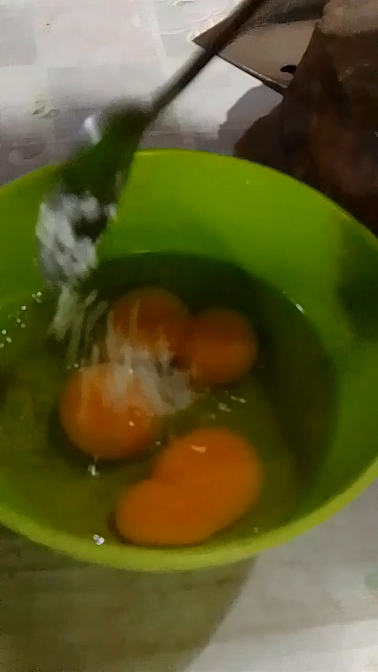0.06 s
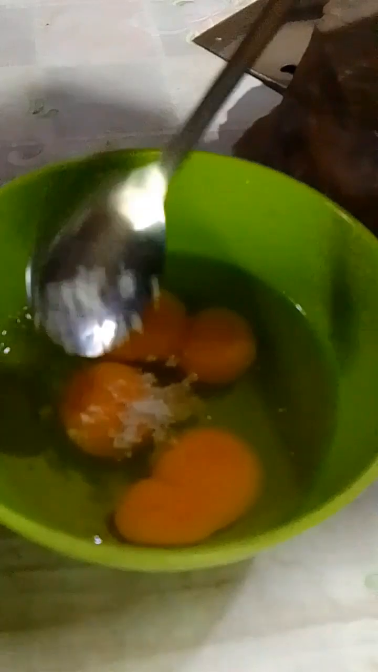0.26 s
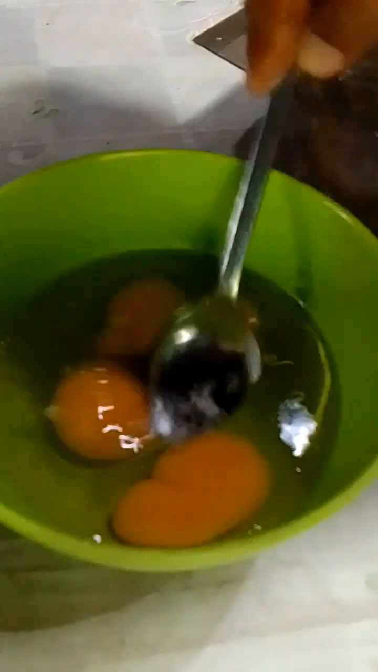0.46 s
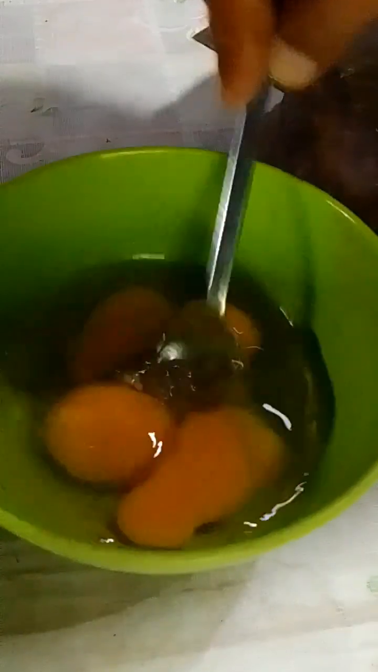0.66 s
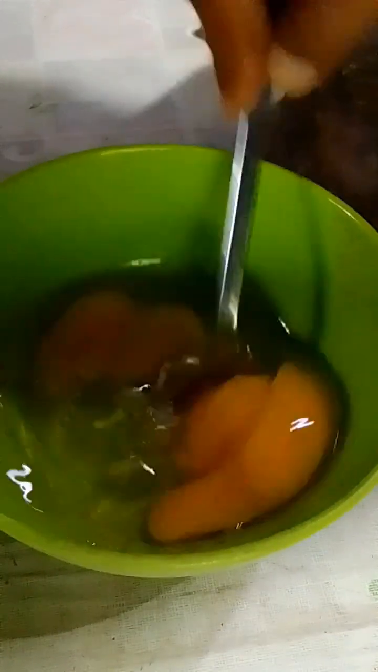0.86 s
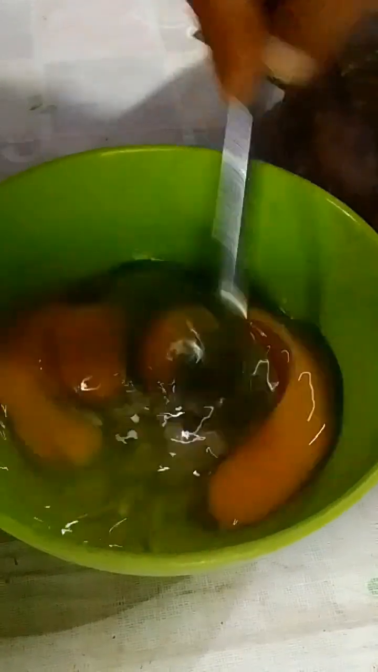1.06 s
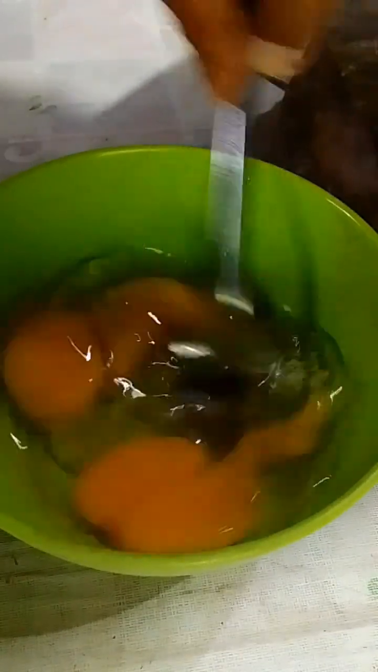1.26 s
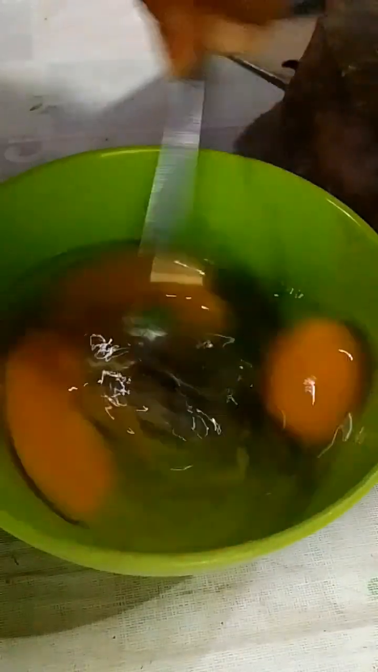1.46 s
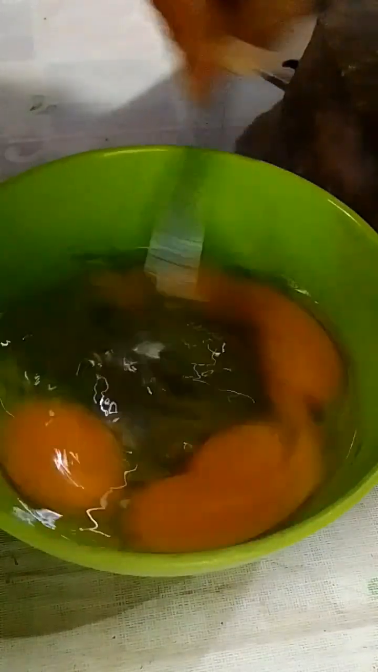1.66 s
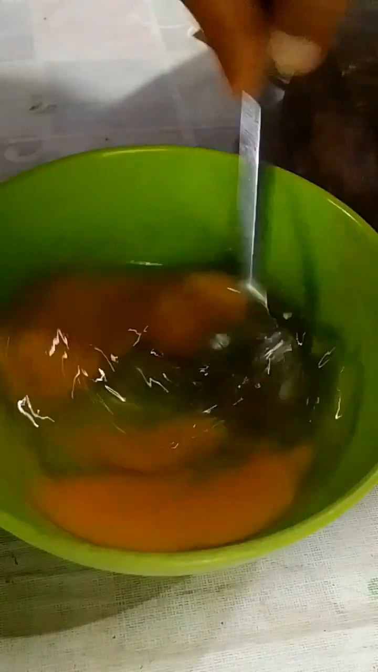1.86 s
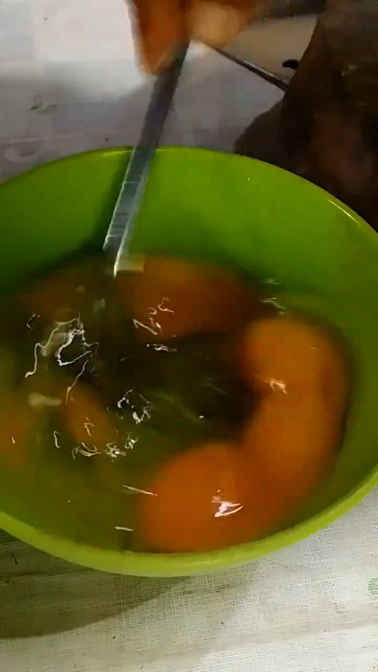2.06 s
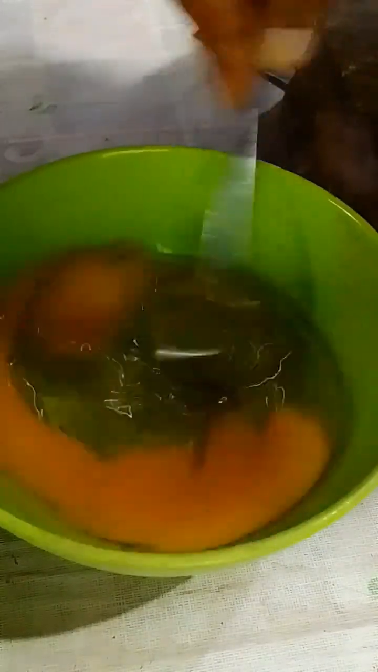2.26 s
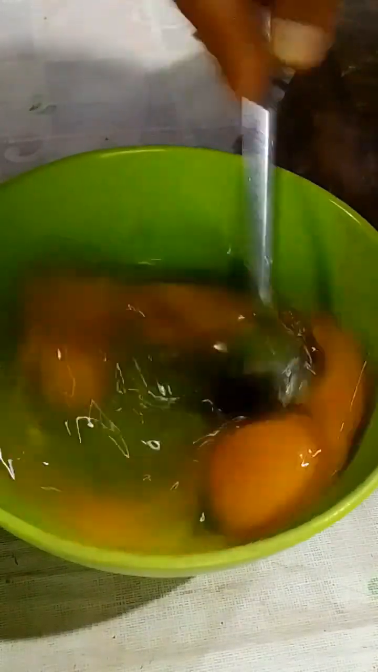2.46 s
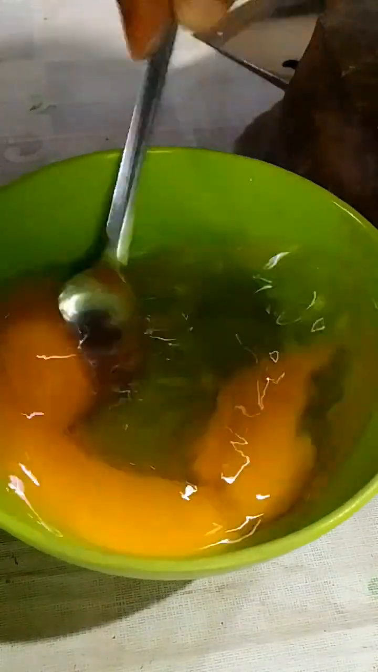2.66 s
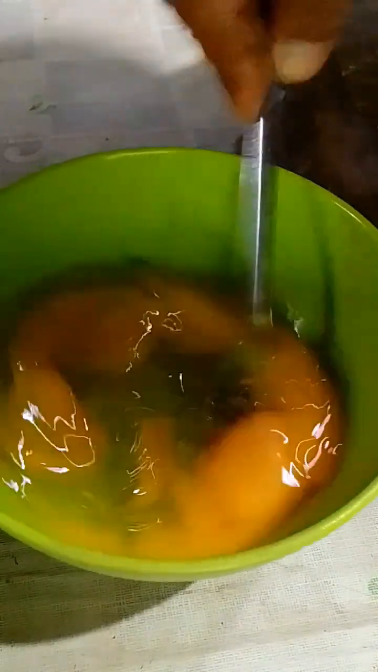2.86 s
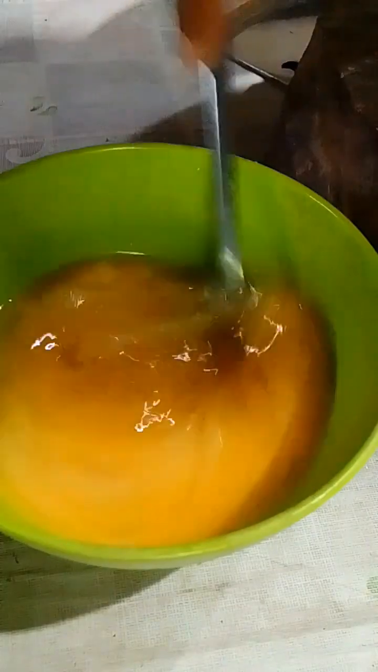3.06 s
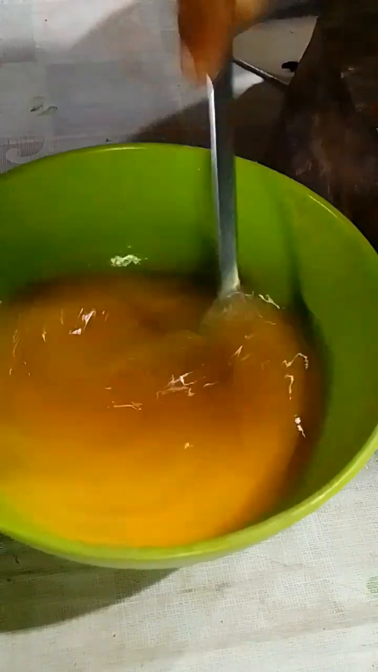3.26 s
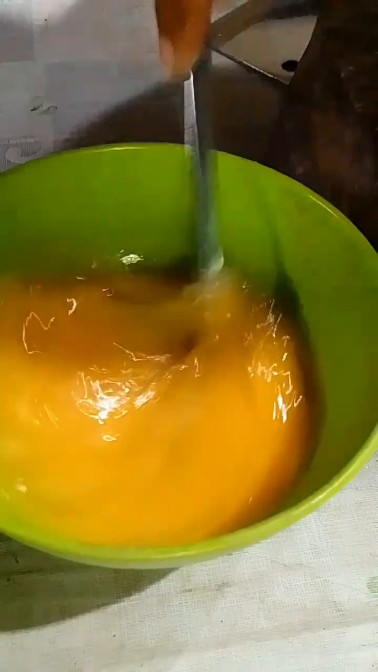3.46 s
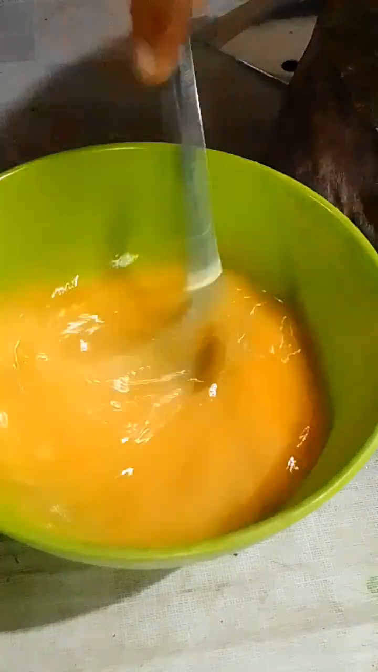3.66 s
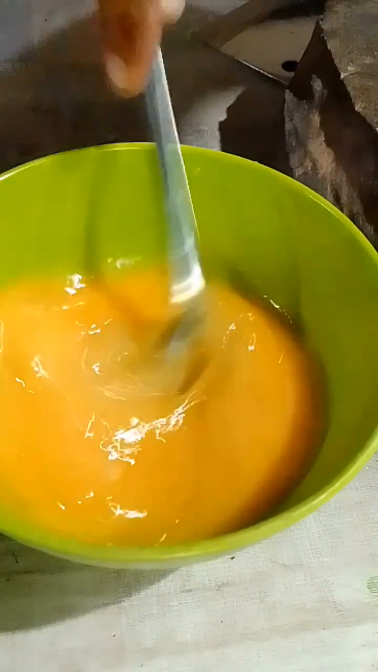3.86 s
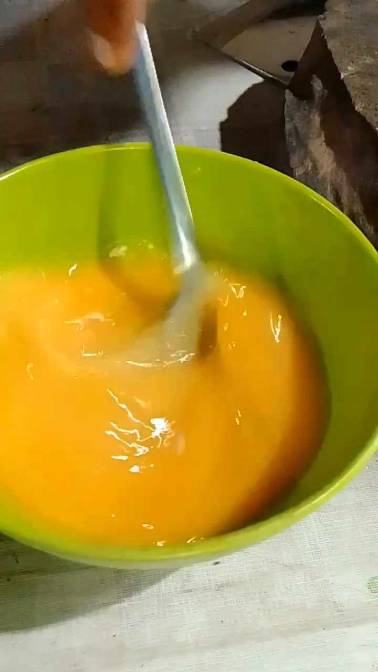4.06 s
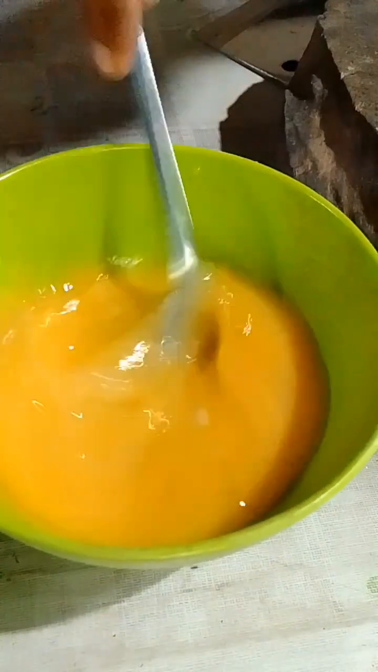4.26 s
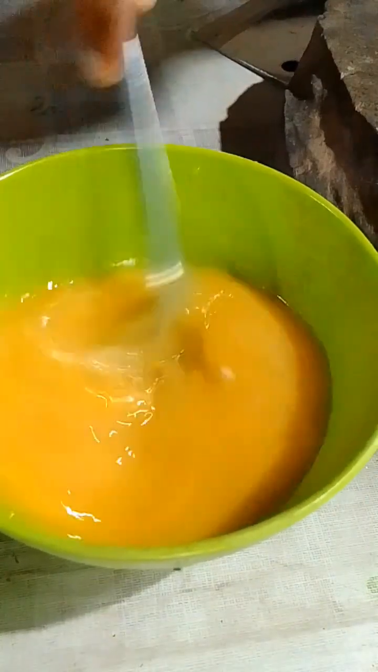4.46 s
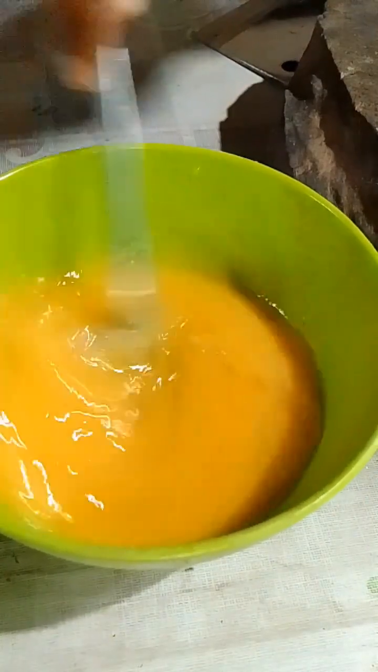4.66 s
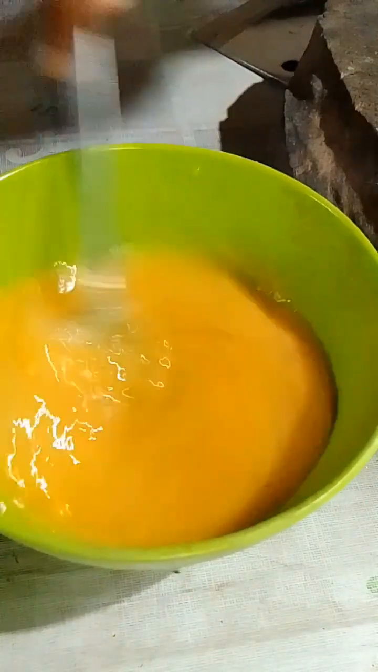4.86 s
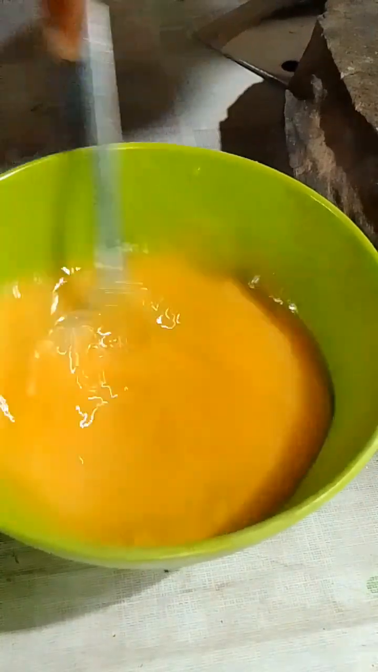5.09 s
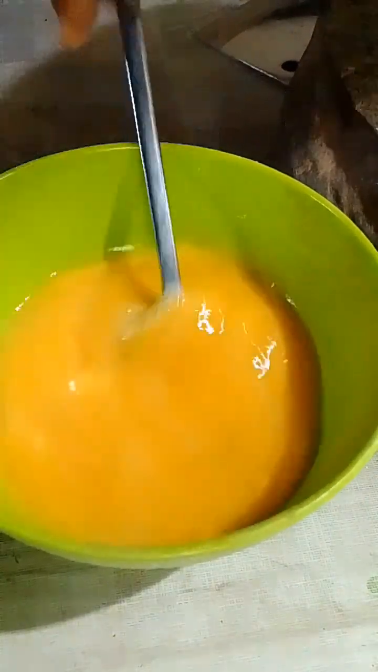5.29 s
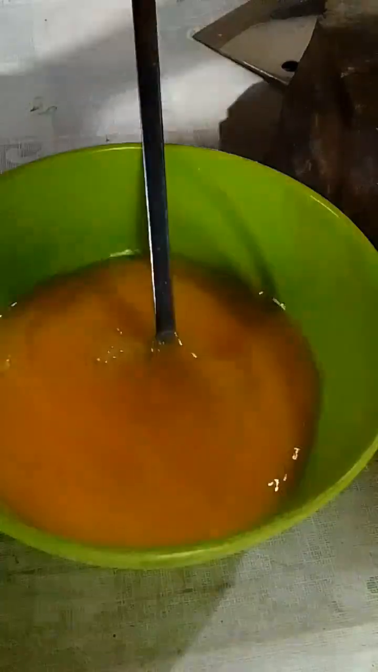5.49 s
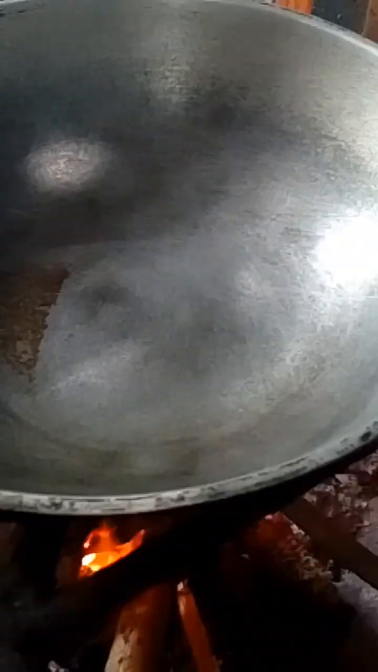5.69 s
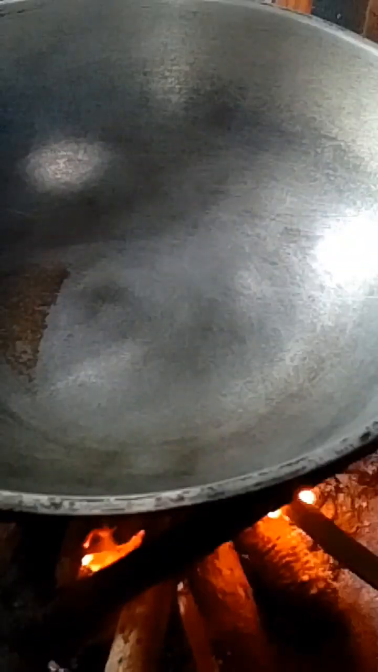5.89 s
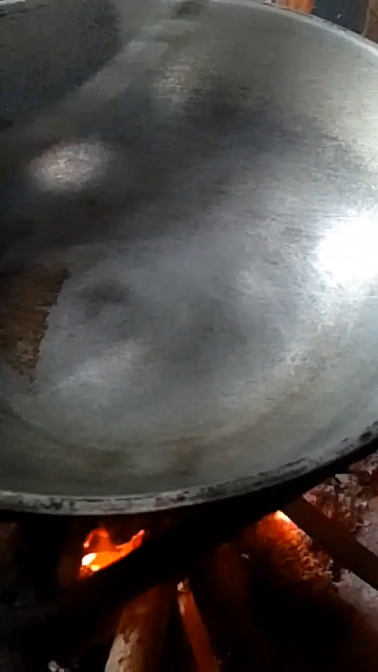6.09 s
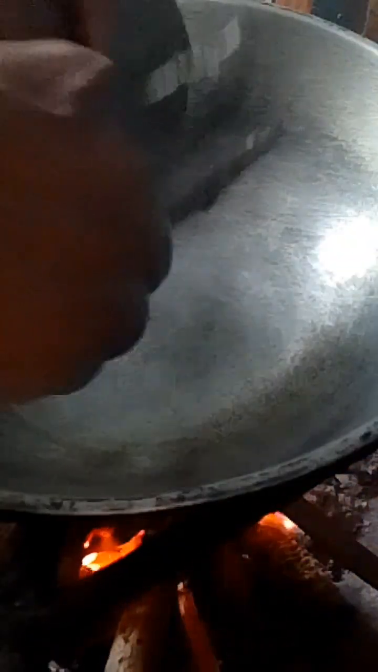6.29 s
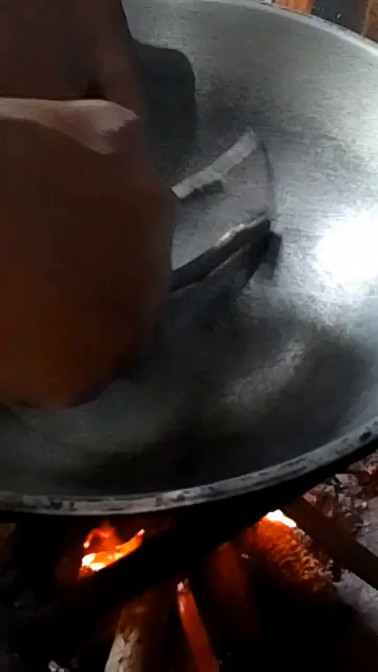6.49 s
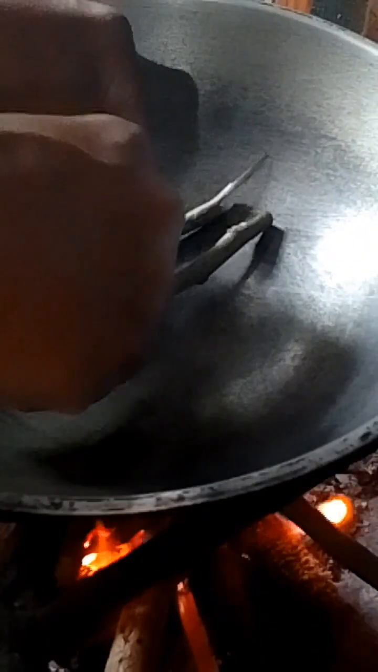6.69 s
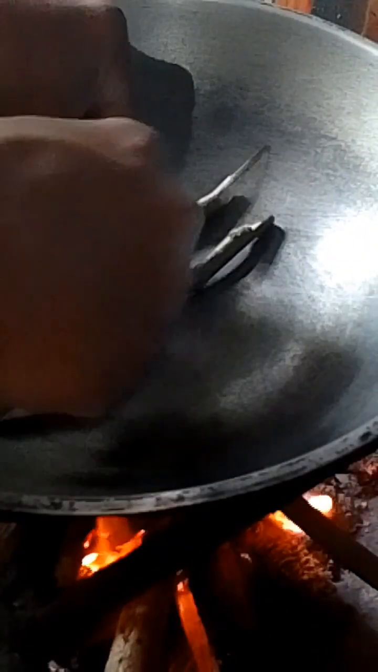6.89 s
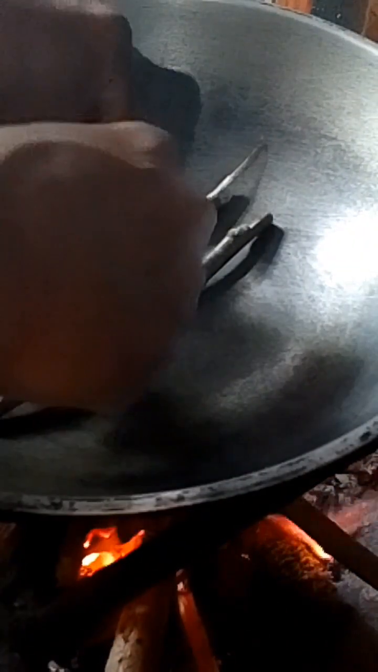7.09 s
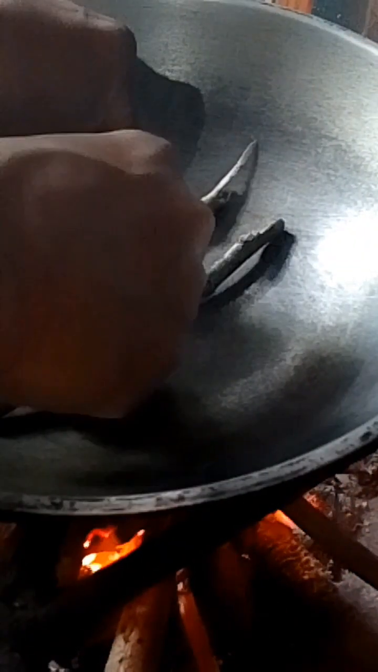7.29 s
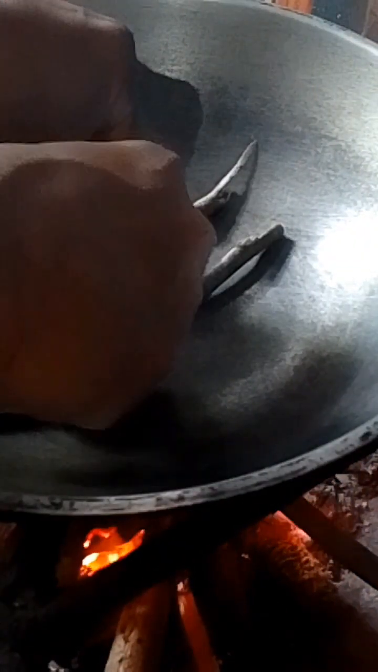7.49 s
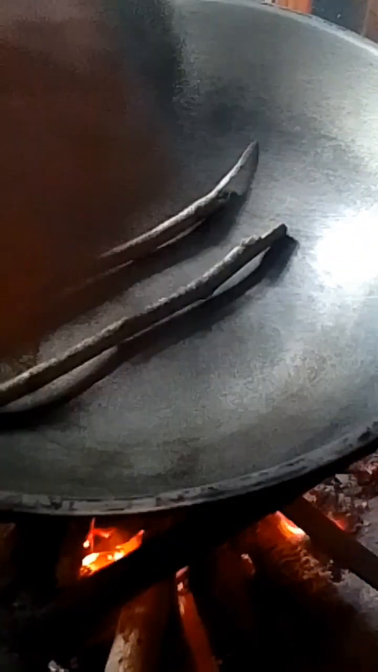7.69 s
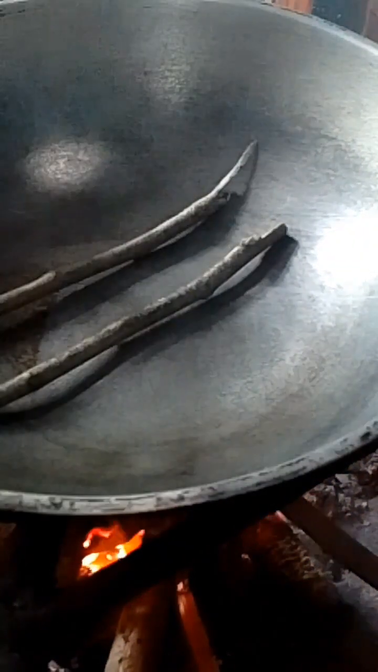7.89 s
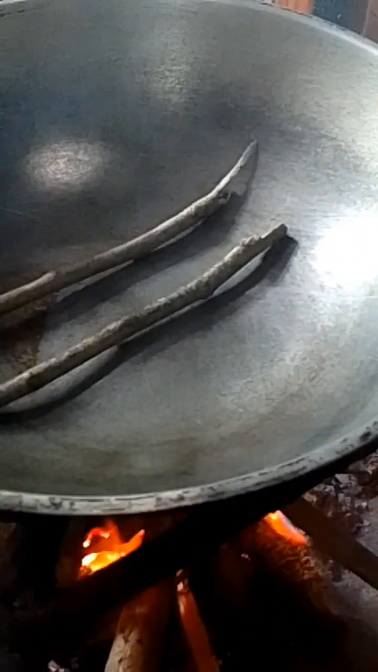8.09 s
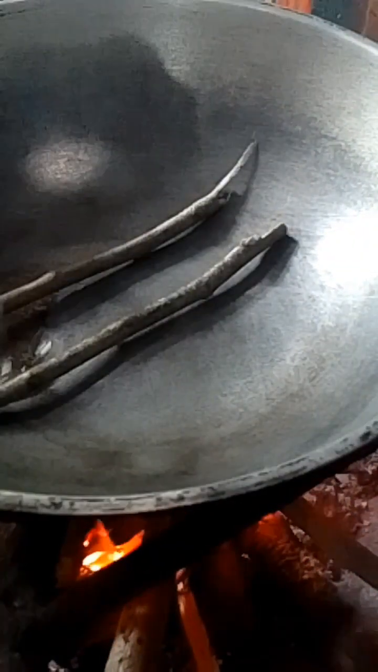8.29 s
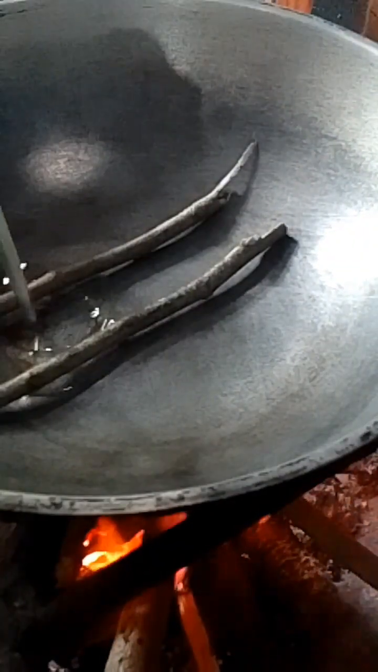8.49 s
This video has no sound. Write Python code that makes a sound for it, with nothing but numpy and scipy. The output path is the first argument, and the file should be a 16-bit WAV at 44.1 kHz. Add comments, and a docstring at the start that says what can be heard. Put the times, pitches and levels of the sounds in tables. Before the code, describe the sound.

Salt rushes off a spoon, then a metal spoon beats eggs fast in a plastic bowl; cut to sticks knocking in a metal pan over crackling fire.

```python
"""Salt rushes off a spoon onto raw eggs, which are then beaten fast in a plastic bowl; small birds cheep.
Cut to a metal pan over a wood fire: sticks slide and knock, embers pop, a hollow vessel hums.
Solids are noise and clicks in banks of resonances; egg, cheeps, pops and thuds are short tones or noise bands.
One close microphone clips the hardest blows and limits the band."""
import sys
import numpy as np
from scipy import signal
from scipy.fft import rfft, irfft, next_fast_len
from scipy.io import wavfile
from scipy.ndimage import uniform_filter1d

SR = 44100
rng = np.random.default_rng(int(sys.argv[2]) if len(sys.argv) > 2 else 0)


def wav_out(sig):
    """Save sig, one row per channel (or a flat mono array), as 16-bit PCM at SR to the path in sys.argv[1]."""
    wavfile.write(sys.argv[1], SR, np.round(np.clip(np.atleast_2d(sig).T, -1, 1) * 32767).astype(np.int16))


N = 376658

# Yard and fire background, dipping at the cut: time_s, level_db
AIR_LEVEL = [(0, -41.5), (.33, -39), (.48, -44), (.51, -41.5), (2.9, -42), (5.2, -40), (5.66, -58),
             (5.675, -48), (5.705, -40), (5.72, -39.5), (6.5, -41), (8.2, -40.5), (8.27, -45),
             (8.29, -37.5), (8.54, -39)]
# Background spectrum: freq_hz, density_db_per_hz
AIR_SPECTRUM = [(12, -52), (20, -9.5), (93, -2), (262, -1.5), (301, -5.5), (459, -8.5), (527, -3.5),
                (678, -7.5), (1260, -8.5), (2260, -15.5), (16000, -23)]
# Falling bird cheeps: start_s, level_db, start_hz, end_hz, length_s
CHEEPS = [(0.224, -12, 4260, 2970, 0.042), (5.717, -22.5, 7600, 5740, 0.026),
          (6.381, -21.5, 7270, 5620, 0.0207)]
# Ember pops and ticks: start_s, peak_db, centre_hz, t60_s
POPS = [(5.7374, -15, 2710, 0.053), (5.7768, -30, 6770, 0.054), (5.9192, 3, 6500, 0.21),
        (5.994, -5, 6200, 0.088), (6.006, -11, 3640, 0.045), (7.238, 9.5, 3520, 0.053),
        (7.9222, -14, 2500, 0.093), (8.0532, -18, 3060, 0.11)]
# Soft thuds: start_s, peak_db, pitch_hz, t60_s
THUDS = [(6.14, -42, 113, 0.034), (7.279, -24.5, 190, 0.031), (7.525, -21, 172, 0.029),
         (7.896, -35, 188, 0.048), (8.219, -44, 86.1, 0.06)]
# Hum of a hollow vessel: time_s, low1_db, low2_db, low3_db, high_db
HUM_LEVELS = [(8.27, -51, -69, -38, -56), (8.296, -35, -54, -25, -59), (8.32, -37, -55, -28, -51),
              (8.362, -42, -44, -38, -46), (8.394, -54, -34, -29.5, -55), (8.454, -57, -43, -45, -45),
              (8.54, -62, -55, -42, -47)]
# Vessel resonances, one bank per HUM_LEVELS level: freq_hz, width_hz, level_db
VESSEL_BANKS = [
    [(495, 34, 0)],
    [(710, 78, 0)],
    [(974, 30, 15), (1320, 120, -16)],
    [(2980, 99, 5), (3850, 100, 5), (4510, 110, 5), (5660, 150, -2)],
]
# Sticks sliding on the bare pan: time_s, level_db
SLIDE_LEVEL = [(5.71, -39), (5.736, -57), (5.784, -26.5), (5.798, -37), (5.914, -34.5), (5.92, -23),
               (5.992, -33.5), (6.012, -21), (6.032, -28.5), (6.374, -38.5), (6.46, -46), (6.6, -47)]
# Bare pan resonances: freq_hz, width_hz, level_db
BARE_PAN = [(1470, 56, 7.5), (2280, 22, 3.5), (2650, 72, 3), (3520, 85, 5.5), (3810, 120, 1.5),
            (4180, 74, -2), (4860, 270, -3.5), (5900, 66, 0.5), (6230, 230, -2.5), (8300, 990, -7.5),
            (9400, 100, -25.5), (12600, 420, -10.5), (14000, 200, -8), (14700, 52, -4)]
# Sticks settling on the loaded pan: time_s, level_db
SETTLE_LEVEL = [(6.78, -37), (6.854, -36), (6.982, -36), (7.236, -32), (7.492, -34.5), (7.826, -34),
                (7.912, -35.5), (8.078, -40.5), (8.26, -47)]
# Loaded pan resonances: freq_hz, width_hz, level_db
LOADED_PAN = [(1384, 103, 6.5), (1757, 130, 1), (2430, 280, -0.5), (3190, 120, 0), (4000, 240, -2),
              (4810, 110, -8), (5220, 60, -8), (6410, 110, -6), (7290, 120, -4), (8000, 38, -5),
              (8140, 230, -8.5), (11180, 150, -8), (12400, 320, -9), (13800, 63, -8)]
# Stick knocks, a dull thock and the pan ringing: start_s, thock_db, thock_hz, thock_t60_s, ring_db
KNOCKS = [(6.805, -14, 700, 0.013, -36), (6.817, -5.5, 675, 0.026, -14), (6.83, -18.5, 583, 0.19, -18),
          (6.844, -8.5, 687, 0.041, -16.5), (6.869, -31, 735, 0.74, -27), (7.003, -5, 683, 0.034, -32),
          (7.011, -23, 667, 0.31, -44), (7.037, -8, 708, 0.03, -21.5), (7.049, -24, 707, 0.22, -27),
          (7.063, -28.5, 627, 0.39, -39)]
# Wood under the thock: freq_hz, width_hz, level_db
WOOD = [(223, 63, -4), (1180, 220, -1.5)]
# Pan ringing when knocked: freq_hz, width_hz, level_db
PAN_RING = [(1722, 12, 10.5), (2460, 18, -4.5), (3160, 44, -37), (3670, 29, -19), (4060, 80, -14.5)]
# Sticks rattling on the rim: start_s, peak_db, pitch_hz, t60_s
RATTLES = [(5.714, -15.5, 948, 0.57), (5.733, -5.5, 1413, 0.074), (5.75, -5.5, 1370, 0.062),
           (5.766, -7, 1190, 0.091), (5.801, -4, 1165, 0.083), (5.819, -13, 934, 0.07),
           (5.847, -17, 1250, 0.098), (5.877, -18.5, 1194, 0.53), (5.899, -44, 1430, 0.07)]
# Salt rushing off the spoon: time_s, level_db
SALT_LEVEL = [(0.0, -14.5), (0.03, -9), (0.236, -17), (0.26, -18.5), (0.384, -45), (0.42, -52)]
# Salt spectrum: freq_hz, density_db_per_hz
SALT_SPECTRUM = [(180, -85), (300, -32), (624, -37), (842, -12), (915, -17), (1390, 1.5), (1640, -7),
                 (2320, -6), (4300, -12), (8220, -18), (16000, -38)]
# Thin line sung by the free spoon: time_s, level_db, pitch_hz
SPOON_SONG = [(0.3, -30, 1550), (0.36, -40, 1590), (0.458, -35, 1554), (0.722, -30, 1505),
              (0.756, -32, 1516), (0.858, -41, 1536), (1.1, -31, 1500), (1.15, -49, 1500)]
# Fuzzier spoon modes: freq_hz, width_hz, level_db
SPOON_MODES = [(1155, 110, 7.5), (3400, 34, 7), (5540, 52, 1), (7270, 120, -3), (8550, 100, 1)]
# Bowl wall flexing: freq_hz, width_hz, level_db
WALL = [(47, 260, -26), (129.5, 32, -2), (209.5, 66.8, 2.5), (219.6, 61.7, -2), (299, 48, -9),
        (388.2, 30, -1), (453.3, 89, -9.5)]
# Bowl floor: freq_hz, width_hz, level_db
FLOOR = [(744, 207, -4.5), (801, 51, 9), (879.7, 45, 7.5), (972, 93, 4.5), (1117, 77, -6), (1091, 55, 3.5),
         (1210, 112, 3), (1318, 30, 3.5), (1420, 70, -0.5)]
# Clatter of spoon on plastic: freq_hz, width_hz, level_db
CLATTER = [(2632, 470, 8.9), (2854, 177, 4), (3070, 300, 10.6), (3480, 650, 9.1), (3917, 920, 5.1),
           (4410, 113, 7.2), (4725, 1800, 3.2), (5250, 1130, 9.4)]
# Thin edge of the steel spoon: freq_hz, width_hz, level_db
EDGE = [(6180, 1400, 3.5), (7260, 1300, 2.5), (8240, 860, 6.5), (9100, 620, -1), (12400, 2500, -16),
        (15200, 1500, -16)]
# Hollow band of the frothy egg: freq_hz, width_hz, level_db
HOLLOW = [(1654, 550, 7.2), (1986, 108, 5.6), (2230, 1170, 0.45)]
# Gain of the hollow band: time_s, level_db
FROTH_LEVEL = [(.5, -40.5), (2.7, -4.5), (3.05, -10), (5.67, -4.5)]
# Spoon blows, last three levels relative to the clatter:
# start_s, clatter_peak_db, floor_rel_db, wall_rel_db, edge_rel_db, chatter_t60_s
BLOWS = [(0.5515, -28, -21, -17, 5, 0.049), (0.5909, -11.5, -28, -28, 2.5, 0.057),
         (0.659, -11, -29, -35, -6, 0.04), (0.706, 2, -20, -27.5, -2.5, 0.21),
         (0.913, -11, -2.5, -20, -1, 0.3), (1.0345, -4.5, -24, -58, -9, 0.033),
         (1.083, -22, 4, -21, -20, 0.018), (1.0952, 1, -3.5, -24, -16, 0.036),
         (1.1454, -13.5, -9, -7, -3, 0.016), (1.1766, -7, 1, -10.5, -17, 0.028),
         (1.2313, -7, -3, -2.5, -16, 0.041), (1.2628, -16, -25, -12, -3, 0.3),
         (1.3129, -7, 1, -0.5, -4, 0.014), (1.3386, -3.5, -6, -13, -8, 0.096),
         (1.4052, -6, -3, -12.5, -4, 0.054), (1.4461, 1.5, -37, -31, -8.5, 0.065),
         (1.469, -8.5, -7, -22.5, 0, 0.062), (1.496, 2.5, -10.5, -25, -9, 0.087),
         (1.566, -4, -4.5, -7.5, -15, 0.024), (1.587, 3, -11, -16, -21, 0.05),
         (1.6494, -19, -1, -18, -21, 0.055), (1.6576, 2, -12.5, -18, -20, 0.015),
         (1.6801, 8, -20.5, -25, -17, 0.021), (1.7471, -8.5, -3, -0.5, -29, 0.017),
         (1.7634, -3.5, -8, -23, -14, 0.16), (1.7817, 1.5, -12, -35, -10, 0.018),
         (1.8369, 4, -8.5, -17, -32, 0.012), (1.859, -4, -14, -16, -30, 0.031),
         (1.9117, -23, 8, -7, -18, 0.036), (1.919, -8.5, -1, -6, -18, 0.088),
         (2.004, 1, -8.5, -13, -22, 0.025), (2.0734, 3, -9.5, -19, -21, 0.019),
         (2.1103, -12, 0, -6, -16, 0.033), (2.1705, -3, 1, -7, -31, 0.023),
         (2.1898, 2.5, -16, -17, -27, 0.043), (2.26, 3.5, -14.5, -20, -14, 0.039),
         (2.3296, -24, 6, -10, -24, 0.11), (2.3424, -1, -2.5, -14, -21, 0.028),
         (2.372, 5, -12, -19, -12, 0.016), (2.4124, 1, -5, -21, -26, 0.028),
         (2.4565, -3, -10.5, -13, -11.5, 0.014), (2.499, 3.5, -12, -21, -11, 0.015),
         (2.5383, -2, -11, -23, -7, 0.019), (2.585, -3.5, -8, -17, -17, 0.02),
         (2.6068, -12, -10, -8, -18, 0.06), (2.6217, 6.5, -22, -30, -13, 0.021),
         (2.671, -0.5, -13, -17, -22, 0.081), (2.7076, 7, -22, -25, -17, 0.013),
         (2.749, -9, -3, -17, -29, 0.1), (2.8151, 1.5, -10.5, -19, -12, 0.048),
         (2.9194, 2, -20, -17.5, -19, 0.041), (2.9541, 1, -11, -18, -16, 0.025),
         (2.9907, 2, -8, -29, -30, 0.018), (3.0942, -3, -30, -28, -14, 0.2),
         (3.1613, 6.5, -20, -22.5, -11, 0.015), (3.194, -17.5, -15, -0.5, -25, 0.031),
         (3.2887, -6.5, -6, -28, -34, 0.04), (3.3231, 1.5, -34, -26, -29, 0.1),
         (3.3706, 5, -11, -25, -19, 0.017), (3.4262, 7, -31, -35, -22, 0.013),
         (3.524, -14, -13, -11, -23, 0.037), (3.54, -15, -4, -26, -22, 0.12),
         (3.6, -7, -11, -9.5, -7, 0.094), (3.719, -13, -12, -23, -27, 0.015),
         (3.7448, -1.5, -20, -33, -11, 0.16), (3.7894, 8, -13, -20, -14, 0.011),
         (3.8361, 5, -11.5, -19, -18, 0.027), (3.8795, -10, 3.5, -1.5, -29, 0.077),
         (3.9505, -1, -16, -37, -15, 0.33), (4.015, 4.5, -10, -24, -24, 0.022),
         (4.1008, -8, -3, -15, -12, 0.16), (4.1853, 10, -24, -24, -14.5, 0.014),
         (4.2135, -12.5, -23, -4.5, -30, 0.03), (4.2644, -16.5, -8, -2, -25, 0.028),
         (4.3025, -18, -16, -20, -27, 0.05), (4.3927, 4.5, -10, -22, -14, 0.021),
         (4.4768, -19, 3, -6, -33, 0.15), (4.5094, -7.5, 2, -11, -35, 0.029),
         (4.5424, -16, -15, -4, -31, 0.12), (4.5958, 7.5, -33, -37, -38, 0.035),
         (4.6096, 6, -11, -16.5, -26, 0.024), (4.7412, 3, -32, -31, -31, 0.034),
         (4.846, -12, 2, -7, -29, 0.031), (4.992, -14, -11, -26, -10, 0.083), (5.01, 1, -22, -27, -22, 0.2),
         (5.0459, 6.5, -12.5, -21, -32, 0.022), (5.074, -11, -7, -7, -22, 0.017),
         (5.375, 8, -15, -39, -17, 0.028), (5.5042, -9, 6, -3, -30, 0.015),
         (5.5637, -31, 8, -17, -41, 0.027)]
# Spoon knocked on the bowl rim and let go: start_s, peak_db, rattle_t60_s
RIM_TAPS = [(5.3747, -6, 0.47), (5.5044, -3.5, 0.092), (5.5323, -5, 0.067), (5.5633, -15, 0.13)]
# Bowl rim modes: freq_hz, width_hz, level_db
RIM = [(2060, 69, 11), (2420, 42, 8), (2730, 60, 10), (3800, 260, 2), (3960, 96, -14), (4830, 100, -6),
       (5040, 48, -12), (5300, 93, -20), (5840, 120, -30)]
# Air pockets gulping in the egg: start_s, peak_db, pitch_hz, t60_s
GULPS = [(2.812, -3, 1220, 0.041), (2.85, -4.5, 945, 0.019), (2.923, -11, 760, 0.042),
         (2.954, -8, 880, 0.046), (2.99, -13, 822, 0.19), (3.028, -12.5, 960, 0.32), (3.125, -6, 827, 0.15),
         (3.252, -7.5, 1115, 0.088), (3.337, -4, 857, 0.3), (3.425, -10, 920, 0.11),
         (3.475, 0, 1090, 0.027), (3.562, -10, 778, 0.24), (3.6, -9, 850, 0.2), (3.664, -5.5, 1196, 0.05),
         (3.741, -22, 1080, 0.065), (3.764, -1.5, 817, 0.072), (3.79, -5.5, 860, 0.057),
         (3.835, -19, 871, 0.037), (3.876, -4.5, 1138, 0.046), (3.987, -7, 850, 0.043),
         (4.017, -5, 874, 0.041), (4.066, -2.5, 1103, 0.097), (4.173, -5, 840, 0.18),
         (4.214, -8, 873, 0.044), (4.262, -5, 1130, 0.025), (4.351, -9, 822, 0.13), (4.375, -4, 808, 0.06),
         (4.471, -6, 1037, 0.16), (4.573, -10, 832, 0.1), (4.613, -18, 1200, 0.046),
         (4.685, 1, 1137, 0.028), (4.773, -20, 1318, 0.3), (4.821, -1.5, 1002, 0.041),
         (4.91, 0.5, 1250, 0.11), (5.028, -7, 1232, 0.17), (5.074, -3, 845, 0.067),
         (5.128, -2, 1090, 0.031), (5.177, -14, 1054, 0.071), (5.234, -3, 908, 0.087),
         (5.298, -29, 806, 0.024), (5.376, -40, 830, 0.061), (5.505, -16, 756, 0.12),
         (5.533, -5.5, 957, 0.096), (5.563, -21, 960, 0.058)]
# Egg slapping the wall: start_s, peak_db, pitch_hz, t60_s
SLAPS = [(0.704, -18, 225, 0.32), (0.918, -8.5, 218, 0.31), (1.115, -15.5, 212, 0.12),
         (1.143, -8.5, 166, 0.05), (1.226, -5, 211, 0.26), (1.314, -12, 484, 0.14), (1.314, 5, 221, 0.14),
         (1.401, -6, 210, 0.092), (1.492, 5, 212, 0.091), (1.567, -1, 222.6, 0.18), (1.655, -7, 208, 0.087),
         (1.743, -2, 222, 0.12), (1.834, -1.5, 219.5, 0.12), (1.915, -5.5, 133, 0.16),
         (2.004, -5, 239, 0.08), (2.062, -6.5, 134, 0.1), (2.26, -3.5, 220, 0.2), (2.334, -12, 361, 0.22),
         (2.409, -5, 214, 0.15), (2.451, -8.5, 226, 0.14), (2.508, -13, 202, 0.12), (2.807, -9, 220, 0.046),
         (2.854, 2, 197, 0.11), (2.953, -14, 213, 0.21), (3.011, -11.5, 161, 0.11), (3.106, -10, 390, 0.14),
         (3.365, -9, 390, 0.14), (3.449, -6.5, 181, 0.15), (3.545, -7, 408, 0.16), (3.597, -5, 190, 0.32),
         (3.687, -0.5, 385, 0.29), (3.985, -0.5, 207, 0.09), (4.348, -11.5, 398, 0.12),
         (4.588, -8, 147, 0.1), (4.712, -6, 390, 0.13), (5.239, -2, 387, 0.13), (5.412, -2, 137, 0.25),
         (5.524, -3, 172, 0.14)]
# First sweep through the egg white: time_s, level_db, pitch_hz
SWEEP = [(.72, -44, 5160), (.76, -21, 4600), (.85, -38, 3870), (.93, -21, 3150), (1.02, -26, 2770),
         (1.08, -55, 2580)]
# Strokes through the egg, each a run-up, a snap and ping on contact, and a fading wake:
# contact_s, snap_peak_db, wake_clatter_db, wake_floor_db, wake_wall_db, wake_t60_s, run_up_db, ping_hz, ping_db
STROKES = [(0.5907, -8, -5.5, -33, -26.5, 0.1, -24, 3470, -10),
           (0.7073, 10, -1, -31, -25, 0.084, -24, 3440, -3),
           (0.816, -1.5, -13, -32, -28, 0.058, -26, 2630, -14),
           (0.9147, -1, -6, -5, -23, 0.25, -26, 3160, -14),
           (1.0362, -7, -8, -22, -34, 0.065, -13, 4650, -10.5),
           (1.0965, -5, -5, -5, -21, 0.09, -22, 3510, -13),
           (1.1693, -14, -6, -21, -17, 0.11, -25, 3430, -22),
           (1.234, -9, -4, -15, -13, 0.064, -23, 2760, -14),
           (1.2651, -14, -6, -21, -8, 0.13, -27, 3500, -22),
           (1.3125, -4, -6, -24, -17, 0.09, -20, 3600, -12),
           (1.403, -7, -2, -10, -22, 0.093, -9, 4070, -13),
           (1.4428, -4, -6, -25, -13, 0.08, -16, 2720, -13),
           (1.4706, -7, -1.5, -21, -12, 0.12, -23.5, 3320, -18),
           (1.565, -1, -11, -2, -17.5, 0.087, -35, 2510, -14),
           (1.6586, 3, -14, -11, -12, 0.067, -14, 3320, -11),
           (1.679, -9, -5, -15, -16, 0.065, -20, 2630, -12),
           (1.7465, -8, -11, -8, -13, 0.1, -26, 3520, -14), (1.7808, 3, -9, -6, -14, 0.086, -13, 3080, -10),
           (1.8384, -3, -5, -2, -11, 0.095, -28, 2930, -14),
           (1.9195, -3, -1.5, -22, -16, 0.14, -22, 4020, -12),
           (2.0049, 3, -9.5, -4.5, -15, 0.18, -13, 2450, -15),
           (2.0743, 2, -7, 0, -17, 0.078, -11, 3600, -14),
           (2.1092, -3, -6.5, -7, -7.5, 0.081, -30, 2600, -19),
           (2.168, 0.5, -2, -2, -8, 0.09, -20, 4490, -6.5), (2.191, -5, -6, -6, -18, 0.097, -22, 2310, -10),
           (2.2613, 1.5, -4.5, -9, -16, 0.11, -9, 2040, -10),
           (2.2828, -5, -6, -18, -26, 0.073, -11, 3280, -5.5),
           (2.343, -7, -7.5, -8, -12, 0.1, -14, 2700, -13), (2.373, 0, -11, -20, -28, 0.095, -17, 3870, -9),
           (2.412, -7, -6, -7, -18, 0.12, -29, 1680, -19), (2.4565, 5.5, -6, -8, -18, 0.1, -27, 3750, -12),
           (2.4993, -3, -6, -5, -10, 0.11, -20, 4200, -12),
           (2.5397, 5.5, -7, -20, -20, 0.081, -16, 3040, -13),
           (2.5848, -6, -9, -20, -15, 0.081, -31, 2920, -15),
           (2.6218, 3, -9.5, -19, -17, 0.11, -12, 1640, -13),
           (2.6717, 2.5, -5.5, -3, -23, 0.091, -18, 3100, -10.5),
           (2.707, 4, -7, -23, -27, 0.067, -23, 2900, -13),
           (2.7493, -4, -5, -3, -22, 0.1, -22, 3160, -11.5),
           (2.8149, -3, 3.5, -1, -24, 0.089, -13, 3000, -8.5),
           (2.8485, -5, -2, 8, -1, 0.078, -24, 3100, -10),
           (2.9198, -11, -1.5, -19, -24, 0.074, -15, 2980, -8),
           (2.953, -9, -6, -10, -4, 0.053, -20, 2490, -4.5),
           (2.9886, 1, -9, -9, -21, 0.13, -28, 3100, -6.5),
           (3.0523, -14, -5, -4, -11.5, 0.16, -9.5, 1850, -6),
           (3.094, 3, -7, -13, -32, 0.23, -11, 2530, -8), (3.1631, 2, -8, -12, -16, 0.11, -7.5, 1720, -9),
           (3.1946, -18, -14, -22, -20, 0.076, -17, 1670, -13),
           (3.2875, -12, -4, -18, -25, 0.14, -18, 2620, -11),
           (3.3221, -5, 0.5, -18, -27, 0.11, -23, 3100, -1.5),
           (3.3706, -6, -13, -13, -3, 0.065, -20, 2620, -12),
           (3.4263, 2.5, -19, -4, -11.5, 0.1, -25, 1670, -3.5),
           (3.5404, -5, -3.5, -10, -24, 0.17, -11, 2390, -10.5),
           (3.5983, 1, -1, -15, -12, 0.093, -16, 3020, -18),
           (3.6605, -5, -4, 3.5, -7, 0.09, -14, 3610, -10), (3.716, -4, -5, -15, -9, 0.14, -14, 3790, -5),
           (3.7887, -6, -17, -13, -7, 0.071, -9, 3070, -6), (3.8343, 3, -7, -10, -10, 0.085, -18, 1620, -9),
           (3.8787, -11, -9, -6, -24, 0.073, -14, 1860, -9),
           (3.949, -4.5, -10, -11, -20, 0.1, -22, 1640, -13),
           (4.0175, 7, -16, -10, -20, 0.083, -13, 2930, -10),
           (4.1005, -4, -4.5, -10, -17, 0.15, -15, 1770, -12),
           (4.15, -1, 1.5, -6, -20, 0.1, -9, 1810, -6.5), (4.2124, -9, -22, -12, -10, 0.084, -25, 4180, -8),
           (4.2627, -14, -13, -6, -8, 0.1, -14, 1530, -7),
           (4.3025, -19, -8, -20, -19, 0.13, -15, 3327, -16),
           (4.349, -3, -4, -15, -14, 0.12, -14, 1850, -12),
           (4.3937, -0.5, -10, -13, -6.5, 0.092, -17, 2640, -7),
           (4.4757, -14, -8, -21, -13, 0.13, -20, 2400, -15),
           (4.513, -9, -11, -13, -15, 0.08, -18, 2470, -5.5),
           (4.5441, -22, -3.5, -12, -14, 0.15, -20, 3790, -11),
           (4.5944, 1, -6, -13, -16, 0.12, -12, 3360, -13),
           (4.7418, -4, -6, -16, -24, 0.12, -15, 3770, -6.5),
           (4.7773, -8, -4, -12, -8.5, 0.2, -20, 3110, -13),
           (4.8432, -8, -9, -19, -17, 0.046, -20, 3134, -15),
           (4.9912, -11, -5.5, -2, -8, 0.12, -25, 4240, -13),
           (5.074, -7, -9.5, -15, -17, 0.2, -15, 4200, -12),
           (5.3753, -4, -11, -2.5, -14, 0.1, -34, 2100, -3.5),
           (5.5045, -5.5, -6, -3, -20, 0.088, -29, 3740, -12),
           (5.5326, -24, -9, 5, -7, 0.073, -17, 2490, -12),
           (5.5614, -29, -24, 8.5, -14, 0.068, -34, 2780, -16)]
# Egg churning between strokes: time_s, clatter_db, floor_db, wall_db
CHURN = [(0.5, -46, -46, -50), (0.64, -28, -50, -50), (0.8, -16.5, -51, -22.5), (0.9, -20, -35, -52),
         (1.15, -24.5, -26, -38), (1.35, -28.5, -21.5, -37), (1.78, -30, -26.5, -39),
         (2.01, -30.5, -20, -31), (2.62, -32, -30.5, -29.5), (3.26, -20, -16, -16.5),
         (3.81, -17.5, -16.5, -23.5), (4.03, -15.5, -15.5, -14.5), (4.45, -25.5, -21.5, -21.5),
         (4.89, -19.5, -14, -16.5), (5.38, -29.5, -28, -23), (5.51, -29, -15, -18),
         (5.67, -36, -28.5, -22.5)]

CUT_S, BEATEN_S = 5.67, 5.32  # bowl cuts to pan; gurgle uses the gulps before BEATEN_S
BAND_LIMIT_HZ = 15900
STROKE_RISE_S, WALL_RISE_S, WALL_LINGER = 0.017, 0.004, 1.77  # WALL_LINGER multiplies the wake t60
EDGE_POWER, EDGE_DULLS_DB_PER_S = 1.37, -2.5  # froth muffles the steel
RUN_UP_S, RUN_UP_FROM_DB, RUN_UP_FLOOR_DB = 0.055, -72, 3  # both dB relative to run_up_db
LULL_S, LULL_DB = 0.044, -3  # churning sinks as the spoon lifts before contact
SNAP_S, SNAP_TRIM_DB, SNAP_BAND_HZ = 0.0029, -6.5, (1213, 5650)
PING_T60_S = 0.019
GURGLE_PEAK_S, GURGLE_DIP_DB, GURGLE_SAG = 0.01527, -15.5, 0.9  # delay after gulp; level, pitch ratio at dips
EGG_PATCHY_DB, PAN_PATCHY_DB = 4, 2.5


def amp(db):
    """Decibels to gain."""
    return 10 ** (np.asarray(db, float) / 20)


def evened(x):
    """Scales to rms 1."""
    return x / np.sqrt(np.mean(x ** 2) + 1e-20)


def add(mix, start_s, sound):
    """Mixes a sound in at start_s."""
    part = mix[round(start_s * SR):][:len(sound)]
    part += sound[:len(part)]


def level(rows, column=1):
    """Gain along a dB curve, silent outside it."""
    rows = np.asarray(rows)
    return amp(np.interp(np.arange(N) / SR, rows[:, 0], rows[:, column], left=-200, right=-200))


def body(x, modes, order=1):
    """Rings a bank of resonances, each applied order times, scaled so that white noise keeps its rms."""
    ring = np.zeros(SR // 3)
    for k, (hz, width_hz, db) in enumerate(modes):
        r = np.exp(-np.pi * width_hz / SR)
        numerator = [1 - r, 0, r * (r - 1)]
        denominator = [1, -2 * r * np.cos(2 * np.pi * hz / SR), r * r]
        mode = signal.unit_impulse(len(ring))
        for _ in range(order):
            mode = signal.lfilter(numerator, denominator, mode)
        ring += (-1) ** k * amp(db) * mode
    return signal.oaconvolve(x, ring / np.linalg.norm(ring))[:len(x)]


def grit(per_s, spread_db, hiss):
    """Sparse clicks of uneven size over a share of hiss, at rms 1."""
    sizes = amp(spread_db * np.minimum(rng.exponential(1, N), 4))
    signs = rng.choice([-1, 1], N)
    clicks = sizes * signs * (rng.random(N) < per_s / SR)
    return evened(evened(clicks) + hiss * rng.standard_normal(N))


def coloured(x, points):
    """Shapes x by a spectrum curve interpolated over log frequency, at rms 1."""
    f, db = np.transpose(points)
    size = next_fast_len(N)
    log_f = np.log(np.fft.rfftfreq(size, 1 / SR) + 1)
    gain = amp(np.interp(log_f, np.log(f + 1), db))
    return evened(irfft(rfft(x, size) * gain, size)[:N])


def bursts(rows, rise_s, q, rough, glide=0.):
    """One short ring a row: a gliding tone mixed with noise around its pitch."""
    out, t = np.zeros(N), np.arange(SR // 6) / SR
    noise = rng.standard_normal((len(rows), len(t)))
    share = np.clip(rough, 0, 1)
    for (start_s, db, hz, t60_s), n in zip(rows, noise):
        t60_s = max(t60_s, .005)
        tone = np.sqrt(2) * np.sin(2 * np.pi * hz * (t + glide * t * t / t60_s))
        edges_hz = [hz / (1 + .5 / q), min(hz * (1 + .5 / q), SR / 2.1)]
        band = signal.butter(2, edges_hz, "band", fs=SR, output="sos")
        ring = (1 - share) * tone + share * evened(signal.sosfilt(band, n))
        shape = (1 - np.exp(-t / rise_s)) * amp(-60 * t / t60_s)
        add(out, start_s, amp(db) * ring * shape / shape.max())
    return out


def strikes(rows, banks, trims_db, rises_s, ticks):
    """Each blow drives every bank with a sharp tick and a decaying noise chatter."""
    out, t = np.zeros(N), np.arange(SR // 6) / SR
    noise = rng.standard_normal((len(rows), len(banks), len(t)))
    for k, modes in enumerate(banks):
        drive = np.zeros(N)
        for row, n in zip(rows, noise):
            shape = (1 - np.exp(-t / rises_s[k])) * amp(-60 * t / max(row[-1], .005))
            push = n[k] * shape / shape.max() + ticks[k] * np.exp(-t / .00004)
            db = row[1] + (row[k + 1] if k else 0)  # later banks are relative to the first
            add(drive, row[0], amp(db) * push)
        out += amp(trims_db[k]) * body(drive, modes)
    return out


def patchy(x, db, bins, frames):
    """Lifts and lowers random patches of the short-time spectrum, so the resonances shift about."""
    z = signal.stft(x, nperseg=512)[2]
    field = uniform_filter1d(rng.standard_normal(z.shape), round(bins), 0)
    field = uniform_filter1d(field, round(frames), 1)
    return signal.istft(z * evened(amp(db * evened(field))), nperseg=512)[1][:N]


def whistle(rows, width_hz):
    """Noise in a resonance that follows the pitch column: slow complex noise turned up to pitch."""
    s, _, hz = np.transpose(rows)
    turn = np.exp(2j * np.pi * np.cumsum(np.interp(np.arange(N) / SR, s, hz)) / SR)
    r = np.exp(-np.pi * width_hz / SR)
    noise = rng.standard_normal(N) + 1j * rng.standard_normal(N)
    slow = signal.lfilter([1], np.convolve([1, -r], [1, -r]), noise)
    return level(rows) * evened((turn * slow).real)


def air():
    """Yard and fire background: shaped hiss with faint grit."""
    return level(AIR_LEVEL) * coloured(grit(300, 1.0, 3.7), AIR_SPECTRUM)


def birds():
    """Falling whistles smeared by the yard's echoes, as decaying noise."""
    out, t = np.zeros(N), np.arange(SR // 3) / SR
    echoes = rng.standard_normal((len(CHEEPS), len(t))) * amp(-60 * t / 0.38)
    for (start_s, db, from_hz, to_hz, length_s), echo in zip(CHEEPS, echoes):
        hz = np.linspace(from_hz, to_hz, round(length_s * SR))
        cheep = np.sin(2 * np.pi * np.cumsum(hz) / SR) * signal.windows.tukey(len(hz), .4)
        smeared = signal.fftconvolve(cheep, echo / np.linalg.norm(echo))
        smeared[:len(cheep)] += .2 * cheep  # direct sound
        add(out, start_s, amp(db) * smeared)
    return out


def fire():
    """Noise pops of the embers, which also shake the pan, and soft low thuds."""
    pops = bursts(POPS, 0.000067, 1.0, rough=1)
    crack_rows = [(s + 0.0017, db, hz, .012) for s, db, hz, _ in POPS]
    cracks = bursts(crack_rows, .0001, 0.93, rough=1)
    shaken_pan = amp(-24.5) * body(pops, LOADED_PAN)
    thuds = bursts(THUDS, 0.0031, 3.1, 0.24)
    return amp(-26.0) * pops + amp(-17) * cracks + shaken_pan + thuds


def vessel():
    """Air noise in the resonances of a hollow vessel, each bank with its own level."""
    out = np.zeros(N)
    for k, modes in enumerate(VESSEL_BANKS):
        breath = level(HUM_LEVELS, column=k + 1) * rng.standard_normal(N)
        out += body(breath, modes, order=2)
    return out


def stick_knocks():
    """A dull thock, then a brief contact pulse that rings pan and wood."""
    thocks = bursts([row[:4] for row in KNOCKS], 0.0051, 6.0, 0.59)
    contact = np.zeros(N)
    for start_s, *_, ring_db in KNOCKS:
        add(contact, start_s + 0.0041, amp(ring_db) * np.hanning(7))
    return thocks + amp(20.5) * body(contact, PAN_RING) + amp(10) * body(contact, WOOD)


def pan():
    """Sticks slide as grit through the pan modes, rattle and knock on the metal."""
    slide = amp(-1.5) * body(level(SLIDE_LEVEL) * grit(1500, 4.7, 2.4), BARE_PAN)
    settle = amp(-2.5) * body(level(SETTLE_LEVEL) * grit(700, 2.8, 1.0), LOADED_PAN, order=2)
    knocks = stick_knocks()
    sliding = patchy(slide + settle, PAN_PATCHY_DB, 5, 15)
    rattles = amp(-9.0) * bursts(RATTLES, 0.0043, 1.6, 0.66)
    return sliding + knocks + rattles


def salt():
    """Dense grains rushing, then the spoon's own faint song."""
    rush = level(SALT_LEVEL) * coloured(grit(6000, 3.4, 0.37), SALT_SPECTRUM)
    song = whistle(SPOON_SONG, 39)
    fuzz = amp(-4.5) * body(level(SPOON_SONG) * rng.standard_normal(N), SPOON_MODES)
    return rush + song + fuzz


def gurgle():
    """The hollow behind the spoon sings, swelling on each gulp and sinking between two."""
    s, db, hz, _ = np.transpose([row for row in GULPS if row[0] < BEATEN_S])
    tops = np.array([s + GURGLE_PEAK_S, db, hz])
    midpoints = (tops[:, 1:] + tops[:, :-1]) / 2
    dips = midpoints * [[1], [1], [GURGLE_SAG]] + [[0], [GURGLE_DIP_DB], [0]]
    rows = np.hstack([tops, dips]).T
    return whistle(rows[np.argsort(rows[:, 0])], 52)


def drag_gains():
    """Gains of the drag on clatter, floor, wall and edge: run-ups and wakes add power to the churning."""
    t = np.arange(SR // 3) / SR
    power = np.array([level(CHURN, column=k + 1) ** 2 for k in range(3)])
    lull_db = np.zeros(N)
    for s, *_ in STROKES:
        add(lull_db, s - LULL_S, np.linspace(0, LULL_DB, round(LULL_S * SR)))
    power = power * amp(lull_db) ** 2
    for s, _, clatter_db, floor_db, wall_db, t60_s, run_up_db, *_ in STROKES:
        wakes = [(clatter_db, STROKE_RISE_S, 1), (floor_db, STROKE_RISE_S, 1), (wall_db, WALL_RISE_S, WALL_LINGER)]
        for k, (db, rise_s, linger) in enumerate(wakes):
            wake = (1 - np.exp(-t / rise_s)) * amp(db - 60 * t / max(linger * t60_s, .02))
            add(power[k], s, wake ** 2)
        climb = amp(run_up_db + np.linspace(RUN_UP_FROM_DB, 0, round(RUN_UP_S * SR)))
        add(power[0], s - RUN_UP_S, climb ** 2)
        add(power[1], s - RUN_UP_S, (amp(RUN_UP_FLOOR_DB) * climb) ** 2)
    gains = np.sqrt(power)
    edge_gain = gains[0] ** EDGE_POWER * amp(EDGE_DULLS_DB_PER_S * np.arange(N) / SR)
    return (*gains, edge_gain)


def slosh():
    """The spoon drags grit through the bowl modes, with patchy resonances, gurgle and first sweep."""
    gains = drag_gains()
    banks = [(CLATTER, 1500, -6), (FLOOR, 400, -3), (WALL, 120, -3), (EDGE, 1500, -3)]  # modes, clicks per s, dB
    clatter, floor, wall, edge = (amp(db) * body(gain * grit(per_s, 3.8, 0.66), modes, order=2)
                                  for gain, (modes, per_s, db) in zip(gains, banks))
    hollow = body(gains[0] * level(FROTH_LEVEL) * grit(700, 4.6, 1.0), HOLLOW, order=2)
    shifting = patchy(clatter + floor + edge + hollow, EGG_PATCHY_DB, 3, 7)
    return shifting + wall + amp(-12.5) * gurgle() + whistle(SWEEP, 380)


def wet_egg():
    """Air pockets gulp with a rising pitch and egg slaps the wall."""
    gulps = amp(-6.5) * bursts(GULPS, 0.024, 13.0, 0.32, glide=0.024)
    slaps = amp(-4.5) * bursts(SLAPS, 0.0023, 7.0, 0.53)
    return gulps + slaps


def pings():
    """A short pitched ring on each contact."""
    rows = [(s, db, hz, PING_T60_S) for s, *_, hz, db in STROKES]
    return amp(1.5) * bursts(rows, 0.00076, 21, 0.44)


def snaps():
    """A needle of broad noise where steel meets plastic."""
    out, shape = np.zeros(N), np.hanning(round(SNAP_S * SR))
    band = signal.butter(2, SNAP_BAND_HZ, "band", fs=SR, output="sos")
    noise = signal.sosfilt(band, rng.standard_normal((len(STROKES), SR // 50)))
    needles = noise[:, -len(shape):] * shape
    for (s, db, *_), needle in zip(STROKES, needles):
        add(out, s, amp(db + SNAP_TRIM_DB) * needle / abs(needle).max())
    return out


def spoon_blows():
    """Spoon blows ring the bowl and the spoon's edge; taps ring the rim."""
    blows = strikes(BLOWS, [CLATTER, FLOOR, WALL, EDGE], trims_db=[-18.0, -5.0, 1.0, -11],
                    rises_s=[0.00031, 0.00056, 0.00028, 0.00032], ticks=[3.55, 5.9, 5.75, 3.4])
    return blows + strikes(RIM_TAPS, [RIM], trims_db=[-16], rises_s=[.001], ticks=[9])


def beating():
    """Blows, slosh, wet egg, pings and snaps, faded out in under 1 ms at the cut."""
    gate = np.clip((CUT_S - np.arange(N) / SR) / 0.00068, 0, 1)
    return (spoon_blows() + slosh() + wet_egg() + pings() + snaps()) * gate


def scene():
    """All sources over the background."""
    return (air() + beating() + salt() + birds() + pan() + fire() + vessel())[None]


def record(dry):
    """Clips at full scale, then low-passes."""
    low_pass = signal.firwin(511, BAND_LIMIT_HZ, window=("kaiser", 9), fs=SR)
    return signal.oaconvolve(np.clip(dry, -1, 1), low_pass[None], "same")


dry = scene()
out = record(dry)
wav_out(out)
```